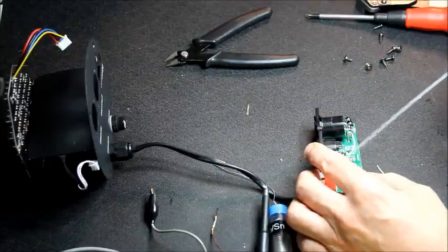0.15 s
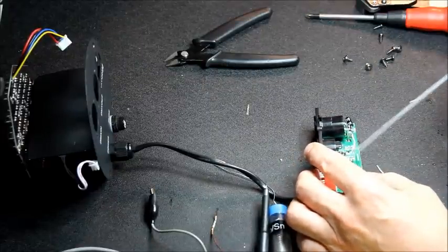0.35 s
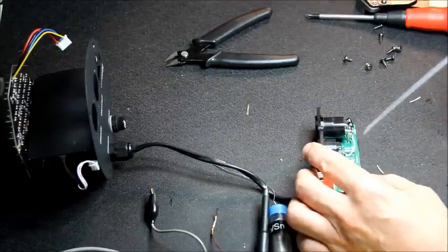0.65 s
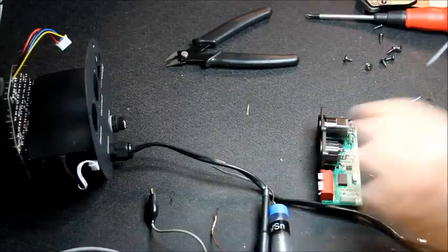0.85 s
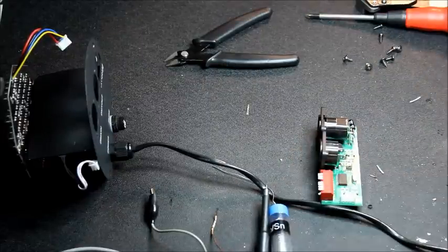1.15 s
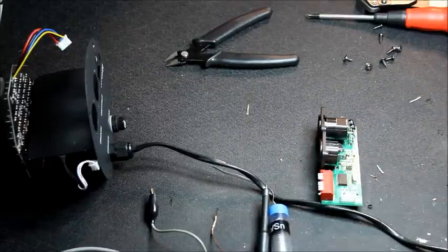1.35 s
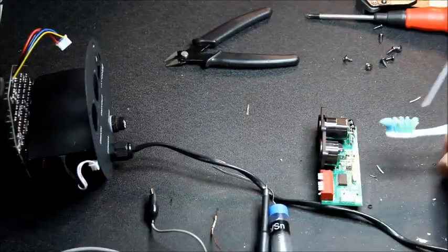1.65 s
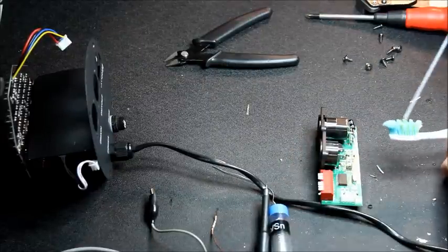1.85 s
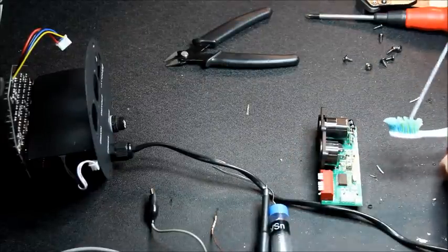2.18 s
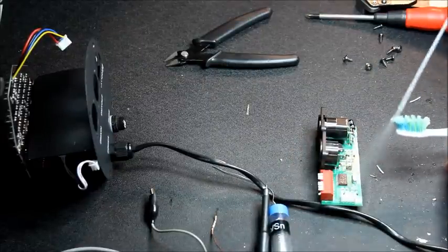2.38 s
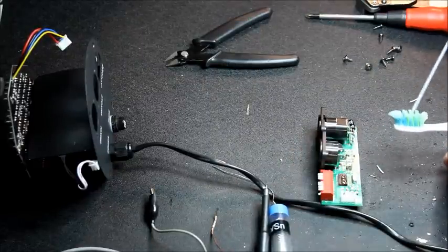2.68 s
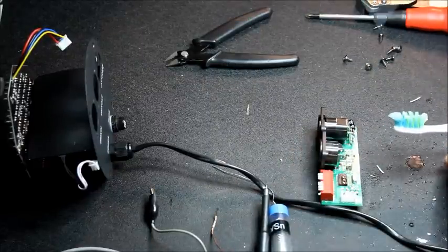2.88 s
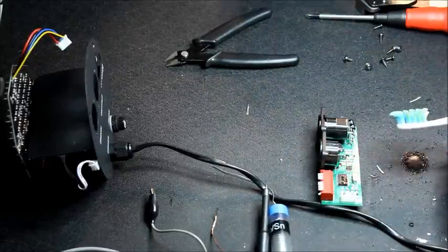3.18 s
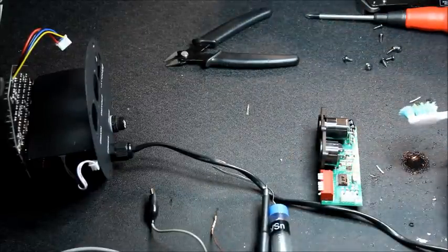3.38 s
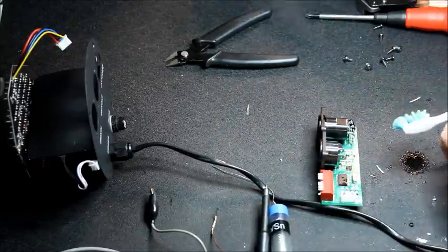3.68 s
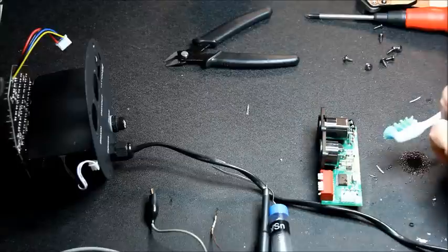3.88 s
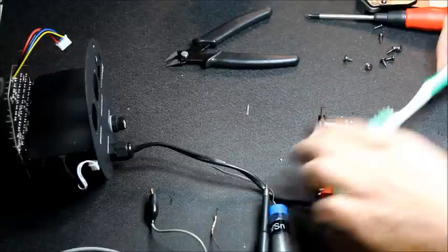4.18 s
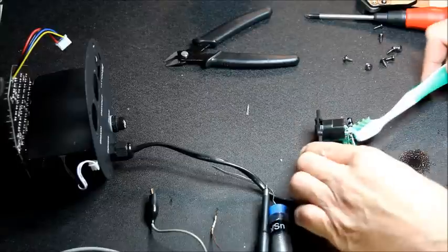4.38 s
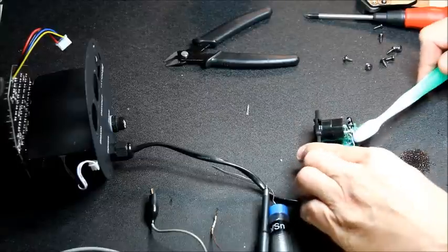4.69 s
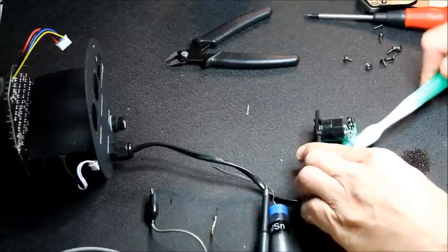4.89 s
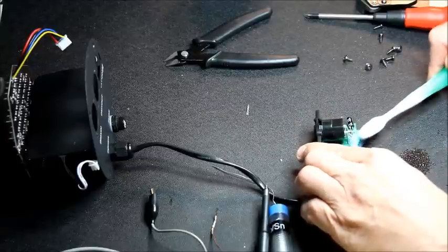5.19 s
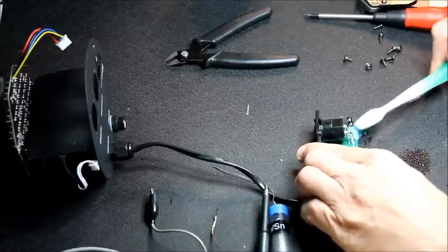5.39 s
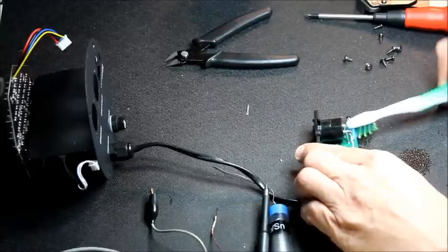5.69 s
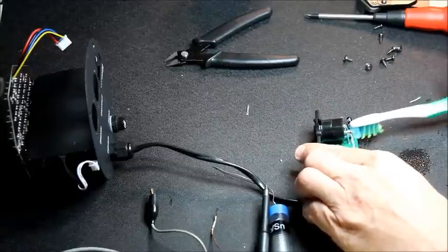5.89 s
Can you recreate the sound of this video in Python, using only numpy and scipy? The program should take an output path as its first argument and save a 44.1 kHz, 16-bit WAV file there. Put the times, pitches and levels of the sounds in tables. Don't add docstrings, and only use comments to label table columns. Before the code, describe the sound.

Two rough hisses from a spray can, one violently loud knock on the bench with a brief metallic ring, then light toothbrush scrubbing over a faint hum.

```python
import sys
import numpy as np
from scipy import signal
from scipy.fft import rfft, irfft, next_fast_len
from scipy.io import wavfile
from scipy.ndimage import uniform_filter1d, map_coordinates

SR = 44100
rng = np.random.default_rng(int(sys.argv[2]) if len(sys.argv) > 2 else 0)


def dump(signal):
    limited = np.clip(np.atleast_2d(signal).T, -1, 1)
    pcm = np.round(limited * 32767).astype(np.int16)
    wavfile.write(sys.argv[1], SR, pcm)


def rack_gain(trim_db):
    fader = np.asarray(trim_db, float)
    return 10 ** (fader / 20)


N = 266805

# start in seconds, level of the blow in dB,
# softness in Hz (lower is duller), decay factor, level of the bench legs' thump in dB.
KNOCKS = [(3.413, 7.5, 2000, .95, -24), (3.49, -17, 400, .7, -44), (3.779, -20, 600, .7, -48),
          (3.811, -18, 350, .8, -48), (.323, -26, 330, .9, -56), (1.3465, -38, 1500, 1.1, -62),
          (5.7705, -33, 1800, .75, -55), (5.786, -38, 700, .7, -70), (1.256, -42, 500, .7, -50),
          (.838, -45, 1500, .45, -62), (3.709, -38, 1200, .7, -64), (6.01, -39, 600, .6, -51),
          (4.425, -52, 300, .7, -52), (4.77, -50, 300, .7, -54), (5.48, -43, 400, .6, -70),
          (1.4, -43, 900, .7, -60)]
HARD_BLOW_S = KNOCKS[0][0]


def unit(x):
    return x / np.sqrt(np.mean(x ** 2) + 1e-20)


def along(points, hz):
    point_hz, values = np.transpose(points)
    return np.interp(np.log(hz + 1), np.log(point_hz + 1), values)


def curves(rows, t):
    seconds, *columns = np.transpose(rows)
    return [np.interp(t, seconds, column) for column in columns]


def bumps(peaks, hz):
    return sum(db / (1 + ((hz - centre) / (width / 2)) ** 2) for centre, width, db in peaks)


def add(track, s, sound):
    part = track[round(s * SR):][:len(sound)]
    part += sound[:len(part)]


def hiss(colour_db, patchy_db, grain_db=0, size=N):
    padded = next_fast_len(size, True)
    grain = unit(uniform_filter1d(rng.standard_normal(padded), size=30))
    raw = rng.standard_normal(padded) * rack_gain(grain_db * grain)
    z = signal.stft(raw, nperseg=1024)[2]
    patches = uniform_filter1d(rng.standard_normal(z.shape), size=8, axis=0)
    patches = uniform_filter1d(patches, size=5, axis=1)
    x = signal.istft(z * rack_gain(patchy_db * unit(patches)), nperseg=1024)[1][:padded]
    colour = rack_gain(colour_db(np.fft.rfftfreq(padded, 1 / SR)))
    return unit(irfft(rfft(x) * colour, padded)[:size])


def dying(colour, decay, factor, size):
    hz, frames, z = signal.stft(rng.standard_normal(size), SR, nperseg=256)
    fade_db = along(colour, hz)[:, None] - 60 * frames / (factor * along(decay, hz)[:, None])
    return signal.istft(z * rack_gain(fade_db), SR, nperseg=256)[1][:size]


def room_tone():
    # pitch in Hz, level in dB per Hz.
    air_colour = [(25, -26), (50, -24), (85, -12), (150, -15), (200, -5), (300, -1), (450, -8), (700, -8),
                  (1000, -10), (2000, -15), (4000, -19), (8000, -24), (15800, -24)]
    # pitch in Hz, width in Hz, height in dB.
    room_peaks = [(318, 70, 5), (598, 40, 4), (232, 30, -4), (700, 30, 2), (1380, 90, 2)]
    # pitch in Hz, level in dB rms.
    hum_tones = [(118.5, -60), (123, -68), (190, -69)]
    air_db = -52
    t = np.arange(N) / SR
    air = hiss(lambda hz: along(air_colour, hz) + bumps(room_peaks, hz), patchy_db=1.2)
    sway = map_coordinates(rng.standard_normal(size=64), [8 * t])
    hum = np.zeros(N)
    for hz, db in hum_tones:
        hum += np.sqrt(2) * rack_gain(db + 1.5 * sway) * np.sin(2 * np.pi * hz * t + .4 * sway)
    return rack_gain(air_db) * air + hum


def plastic_contacts():
    # start in seconds, peak in dB, resonance in Hz, t60 in seconds.
    taps = [(.832, -42, 3000, .02), (.84, -38, 3950, .12), (.844, -35, 2050, .06), (.925, -42, 2000, .03),
            (1.331, -41, 3200, .04), (1.347, -39, 1400, .12), (1.424, -44, 1000, .06),
            (1.345, -42, 8000, .06), (3.35, -48, 6200, .06), (3.709, -41, 5100, .25),
            (3.709, -38, 2000, .15), (3.71, -47, 9300, .2), (3.71, -36, 1350, .2), (3.785, -43, 1800, .06),
            (4.1075, -40, 1900, .05), (4.403, -47, 3300, .03), (4.546, -49, 3500, .08),
            (5.773, -37, 1300, .1), (5.776, -39, 1800, .07), (5.935, -45, 1700, .15)]
    scuffs = [(.232, -47, 4000, .25), (.2765, -36, 5500, .035), (.839, -34, 4300, .07),
              (.93, -40, 4000, .09), (1.923, -37, 3100, .04), (3.163, -50, 8000, .06),
              (3.806, -46, 3200, .08), (4.158, -48, 4800, .06), (5.928, -36.5, 2700, .2),
              (6.01, -42, 2600, .06)]
    slides = [(1.228, -46, 2500, .2), (1.25, -42, 2300, .1), (1.248, -43, 3400, .1),
              (1.288, -46, 3500, .15), (1.415, -47, 3100, .15), (2.995, -48, 2900, .2),
              (3.06, -53, 4000, .2), (4.24, -52, 2300, .3), (4.43, -49, 3500, .12), (5.94, -44, 4200, .2)]
    # share of broad noise in dB, rise in seconds.
    contact_kinds = [
        (-18, .001),
        (-3, .0012),
        (-9, .008),
    ]
    out, t = np.zeros(N), np.arange(SR // 5) / SR
    hz = np.fft.rfftfreq(len(t), 1 / SR)
    broad = 1 / (1 + (500 / (hz + 1)) ** 2 + (hz / 7500) ** 2)
    for rows, (broad_db, rise_s) in zip((taps, scuffs, slides), contact_kinds):
        for s, db, contact_hz, t60 in rows:
            resonance = 1 / (1 + ((hz - contact_hz) / (.1 * contact_hz)) ** 2) ** 2
            power = resonance + rack_gain(2 * broad_db - 16) * broad
            burst = unit(irfft(rfft(rng.standard_normal(len(t))) * np.sqrt(power)))
            rise = 1 - np.exp(-t / max(rise_s, 1e-4))
            add(out, s, rack_gain(db - 1.5 - 60 * t / t60) * rise * burst)
    return out


def spray():
    # time in seconds, flow in dB, wetness in dB (liquid in the jet trades low tone for fizz).
    presses = [
        [(.275, -49, .1), (.294, -44, 1.5), (.346, -44, 1.5), (.362, -40.5, 2.5), (.43, -39.5, -.1),
         (.59, -37.7, .1), (.655, -42, -1.5), (.705, -53.5, -2.5)],
        [(1.922, -50, 2.5), (2.0, -43, -1.5), (2.085, -38, 2.2), (2.37, -35.8, 1.2), (2.49, -38.5, -3.5),
         (2.63, -36, 5.5), (2.7, -35, 1.6), (2.872, -36, 3.5), (2.922, -54, -1.5)],
    ]
    # pitch in Hz, width in Hz, height in dB.
    straw_near_board = [(500, 120, 5), (1290, 170, 8.5), (2030, 200, 6), (2410, 100, 6), (3150, 150, 4),
                        (3420, 200, 4), (3810, 150, 4), (4540, 250, 4), (6200, 700, 8), (7480, 250, 5),
                        (8610, 200, 3), (10000, 200, 4), (12100, 300, 3), (14500, 4000, -4),
                        (8300, 1500, 2)]
    straw_at_brush = [(640, 100, 4), (950, 150, 7), (1180, 250, 7), (2000, 200, 3), (2270, 150, 6),
                      (2460, 100, 4), (2750, 250, -3), (3250, 400, 6.5), (4000, 200, 5), (4450, 300, 5),
                      (4800, 150, 7.5), (5450, 200, 3), (7080, 250, 6), (7830, 300, 3), (10500, 300, 3),
                      (14000, 400, 3), (14300, 3500, 3)]
    # pitch in Hz, level in dB per Hz.
    jet_colour = [(60, -40), (200, -16), (420, -3.5), (900, -3.5), (1700, -3.5), (3000, -1), (6000, -3),
                  (10000, -5), (15800, -6)]
    low_tone_db, fizz_share_db = -5.5, -2.4
    full_flow_db, fizz_grows, low_grows = -37, .12, -.05
    shut_s, shut_db_per_s = .07, -180
    out = np.zeros(N)
    for rows, straw in zip(presses, (straw_near_board, straw_at_brush)):
        open_s, close_s = rows[0][0], rows[-1][0]
        t = np.arange(round(open_s * SR), round((close_s + shut_s) * SR)) / SR
        jet_db, wet_db = curves(rows, t)
        jet_db = jet_db + shut_db_per_s * np.maximum(t - close_s, 0)
        low_db = low_tone_db + low_grows * (jet_db - full_flow_db) - wet_db
        fizz_db = fizz_share_db + fizz_grows * (jet_db - full_flow_db) + .6 * wet_db
        bands = ((jet_db + low_db, 20, 1700), (jet_db, 1700, 7200), (jet_db + fizz_db, 7200, 20000))
        for level_db, lo_hz, hi_hz in bands:
            def colour(hz):
                band_db = -10 * np.log10((1 + (lo_hz / (hz + 1)) ** 12) * (1 + (hz / hi_hz) ** 12))
                return along(jet_colour, hz) + bumps(straw, hz) + band_db

            flow = hiss(colour, patchy_db=1.1, grain_db=1.2, size=SR * 3 // 2)[:len(t)]
            add(out, t[0], rack_gain(level_db + 1.2) * flow)
    return out


def knocks():
    # pitch in Hz, level in dB, t60 in seconds.
    bench_modes = [(231, -6, .16), (135, -13, .1), (182, -14, .12), (253, -8, .34), (273, -2, .14),
                   (322, 1.5, .11), (396, -9, .14), (380, 7, .03), (493, -10, .15), (680, 13, .024),
                   (621, -3, .09), (674, -2, .09), (727, -2, .085), (776, -2, .08), (931, -13, .1),
                   (1075, -6, .08), (1200, -14, .12), (1379, -14, .11), (1480, -16, .1), (1661, -19, .1),
                   (1950, -15, .09), (2400, -9, .05)]
    # pitch in Hz, level in dB.
    bench_body = [(40, -24), (100, -32), (200, -6), (400, 0), (700, 0), (1500, -5), (3000, -14),
                  (6000, -26), (15000, -35)]
    # pitch in Hz, t60 in seconds.
    bench_decay = [(60, .2), (250, .22), (600, .135), (2000, .17), (5000, .17), (12000, .09)]
    leg_hz, leg_t60 = 64, .26
    out, t = np.zeros(N), np.arange(SR // 2) / SR
    hz, level_db, t60 = np.transpose(bench_modes)[:, :, None]
    for s, db, soft_hz, decay, thump_db in KNOCKS:
        strength_db = level_db + rng.normal(0, 1.5, hz.shape)
        modes = rack_gain(strength_db - 60 * t / (t60 * decay)) * np.sin(2 * np.pi * hz * t)
        ring = -np.sum(modes, axis=0)
        dense = dying(bench_body, bench_decay, decay, size=len(t))
        body = (rack_gain(-6) * ring + rack_gain(4) * dense) * (1 - np.exp(-t * soft_hz / 1.3))
        contact = signal.butter(N=1, Wn=[135, max(soft_hz, 170)], btype="band", fs=SR)
        thump = rack_gain(thump_db - 60 * t / leg_t60) * np.sin(2 * np.pi * leg_hz * t)
        thump = thump * (1 - np.exp(-t / .008))
        add(out, s, rack_gain(db) * signal.lfilter(*contact, body) + thump)
    return out


def snaps():
    # start in seconds, peak in dB, pitch in Hz, t60 in seconds.
    snap_events = [(.8325, -38, 3000, .006), (.8387, -24, 4300, .012), (.8388, -34, 8000, .005),
                   (.8965, -42, 2600, .01), (.9315, -39.5, 4000, .015), (1.3308, -37, 3000, .008),
                   (3.7092, -36, 3500, .004), (3.778, -36, 3000, .008), (4.7394, -41, 3000, .006),
                   (4.7713, -38, 3850, .01), (4.8472, -40, 6500, .006), (5.1759, -36, 3070, .01),
                   (5.2931, -40, 3080, .008), (5.339, -42, 9000, .004), (5.3715, -39, 6000, .006),
                   (5.4707, -35, 10500, .008), (5.7706, -33, 2000, .004), (5.772, -29, 3200, .008),
                   (5.7795, -36, 1700, .015), (5.7825, -36, 2600, .006), (5.9287, -33, 2640, .01),
                   (6.0105, -37, 3030, .008)]
    out, t = np.zeros(N), np.arange(SR // 25) / SR
    for s, db, snap_hz, t60 in snap_events:
        add(out, s, rack_gain(db - 60 * t / t60) * np.sin(2 * np.pi * snap_hz * t))
    return out


def handling():
    # start in seconds, rustle in dB, low shuffle over rustle in dB, t60 in seconds.
    grips = [(.836, -36, -10, .14), (.915, -48, -1.5, .45), (1.243, -51, -1.1, 1.5), (1.352, -54, 10.5, .8),
             (2.96, -59, .1, 1.8), (3.164, -61, -4, .25), (3.706, -42, 1.1, .4), (3.776, -45, 15.5, .26),
             (4.12, -57, -1.1, .7), (4.22, -62, 1.1, 2.5), (4.398, -56, -8, .7), (4.543, -56, -13, .3)]
    # pitch in Hz, level in dB per Hz.
    rustle_colour = [(900, -20), (1600, -3), (3000, 0), (5000, -4), (8000, -12), (15800, -20)]
    shuffle_colour = [(30, -24), (60, -8), (150, 1.5), (500, -2), (1100, -8), (1800, -14), (4000, -40)]
    rise_s, shuffle_lingers = .006, 1.5
    t, size = np.arange(SR // 2) / SR, 5 * SR
    skin, bench = np.zeros((2, size))
    grip = (1 - np.exp(-t / rise_s)) ** 2 * np.cos(np.pi * t) ** 2
    for s, db, low_db, t60 in grips:
        add(skin, s, grip * rack_gain(2 * (db - 4 - 60 * t / t60)))
        add(bench, s, grip * rack_gain(2 * (db - 4 + low_db - 60 * t / (t60 * shuffle_lingers))))
    rustle = hiss(lambda hz: along(rustle_colour, hz), patchy_db=3, grain_db=3, size=size)
    shuffle = hiss(lambda hz: along(shuffle_colour, hz), patchy_db=3, grain_db=2.1, size=size)
    return np.pad(np.sqrt(skin) * rustle + np.sqrt(bench) * shuffle, (0, N - size))


def can_ring():
    # pitch in Hz, level in dB, t60 in seconds.
    wall_tones = [(1141, -38, 1.6), (807, -52, 1.6)]
    gripped_s = 3.712
    t = np.arange(N) / SR - HARD_BLOW_S
    ring = sum(rack_gain(db - 60 * np.abs(t) / t60) * np.sin(2 * np.pi * hz * t) for hz, db, t60 in wall_tones)
    damping = rack_gain(-60 * np.maximum(t + HARD_BLOW_S - gripped_s, 0) / .04)
    return ring * (t > 0) * damping


def brush():
    # peak time in seconds, bristle fizz in dB, board scrape over fizz in dB, 3 dB rise in seconds.
    strokes = [(4.613, -53, 1.3, .006), (4.665, -50, .1, .019), (4.742, -53, 1.1, .007),
               (4.777, -49, 1.1, .007), (4.82, -53, -1.1, .006), (4.851, -48, 1.1, .007),
               (4.897, -52, 4, .028), (4.955, -54, 3, .015), (5.003, -46, 5, .015), (5.083, -51, 1.1, .035),
               (5.181, -46.5, 2.1, .009), (5.25, -54, 4, .016), (5.297, -52, 3, .007),
               (5.345, -50, -4, .005), (5.382, -49, 5, .013), (5.438, -50, 1.2, .01),
               (5.473, -45, .1, .004), (5.49, -39, -1.1, .01), (5.54, -49, .1, .015), (5.586, -49, -3, .02),
               (5.635, -55, 3, .015), (5.689, -57, 4, .02), (5.772, -50, -2.1, .012),
               (5.843, -48.7, -3, .013), (5.895, -56, 4, .015), (5.94, -52, 5, .007),
               (6.012, -47, .1, .005)]
    # pitch in Hz, level in dB per Hz.
    bristle_colour = [(3000, -20), (5500, -4), (7500, 0), (9000, -3), (12000, -1), (15800, -2)]
    board_colour = [(70, -30), (160, -7), (400, 1.2), (1000, -1.5), (2100, -6), (3400, -3), (4500, -5),
                    (6500, -10), (10000, -30)]
    # pitch in Hz, width in Hz, height in dB.
    board_peaks = [(222, 40, 9), (690, 80, 2), (2300, 200, 1.5), (3050, 400, 1.2), (4050, 300, 1.5),
                   (7470, 600, 1.5)]
    brush_down_s, press_s = 4.5, .45
    drag_fizz_db, drag_scrape_db = -59, -56.5
    fall_s = .014
    t = np.arange(round(brush_down_s * SR), N) / SR
    touch = np.clip((t - t[0]) / press_s, 0, 1)
    fizz = touch * rack_gain(drag_fizz_db) ** 2
    scrape = touch * rack_gain(drag_scrape_db) ** 2
    for s, fizz_db, scrape_db, rise_s in strokes:
        distance = np.abs(t - s) / np.where(t < s, rise_s, fall_s)
        power = rack_gain(2 * (fizz_db - 3 * distance ** 2.1))
        fizz = fizz + power
        scrape = scrape + power * rack_gain(2 * scrape_db)
    tips = hiss(lambda hz: along(bristle_colour, hz) + bumps(board_peaks, hz),
                patchy_db=1.5, grain_db=2.2, size=2 * SR)[:len(t)]
    board = hiss(lambda hz: along(board_colour, hz) + bumps(board_peaks, hz),
                 patchy_db=2.8, grain_db=2.6, size=2 * SR)[:len(t)]
    out = np.zeros(N)
    add(out, t[0], rack_gain(1.4) * np.sqrt(fizz) * tips + rack_gain(-.6) * np.sqrt(scrape) * board)
    return out


def catches():
    # start in seconds, length in seconds, level in dB, the part's pitch in Hz.
    caught_parts = [(4.641, .046, -52, 4600), (4.739, .012, -53, 4000), (4.771, .028, -50, 3500),
                    (4.772, .026, -54, 7000), (4.846, .014, -51, 7000), (4.875, .04, -53, 3600),
                    (4.89, .02, -55, 6300), (4.975, .045, -48, 2800), (4.99, .03, -52, 1300),
                    (5.0, .02, -53, 4100), (5.076, .022, -51, 7600), (5.05, .06, -55, 3200),
                    (5.176, .02, -50, 3000), (5.18, .025, -54, 7500), (5.24, .03, -55, 3200),
                    (5.293, .01, -52, 6500), (5.34, .035, -55, 12000), (5.372, .032, -51, 3500),
                    (5.373, .02, -53, 7300), (5.43, .03, -54, 10500), (5.455, .015, -53, 7200),
                    (5.485, .02, -49, 4100), (5.575, .045, -52, 7600), (5.76, .012, -54, 10500),
                    (5.82, .03, -55, 7000), (5.945, .035, -50, 2900), (5.95, .03, -53, 4300)]
    half_width, edge_s = .2, .003
    out, t = np.zeros(N), np.arange(SR // 10) / SR
    hz = np.fft.rfftfreq(len(t), 1 / SR)
    for s, length, db, part_hz in caught_parts:
        flicks = rng.standard_normal(len(t)) * rack_gain(2.8 * rng.standard_normal(len(t)))
        resonance = 1 / (1 + ((hz - part_hz) / (half_width * part_hz)) ** 2)
        ring = unit(irfft(rfft(flicks) * resonance))
        gate = np.clip(t / (edge_s / 3), 0, 1) * rack_gain(-6 * np.maximum(t - length, 0) / edge_s)
        add(out, s, rack_gain(db - 1.5) * gate * ring)
    return out


def walls(x, wet_db, factor):
    # pitch in Hz, t60 in seconds.
    room_decay = [(150, .35), (800, .27), (4000, .25), (12000, .15)]
    tail = dying([(100, -6), (1000, 0), (4000, 0), (15000, -4)], room_decay, factor, size=SR // 3)
    delayed = np.pad(x, (SR // 150, 0))
    echo = signal.fftconvolve(delayed, tail / np.linalg.norm(tail))[:N]
    return x + rack_gain(wet_db) * echo


def scene():
    hits = walls(knocks() + plastic_contacts() + snaps(), wet_db=-16, factor=1.1)
    hisses = rack_gain(-.5) * walls(spray() + handling(), wet_db=-10, factor=.35)
    scrub = walls(brush() + catches(), wet_db=-13, factor=.4)
    return np.tile(room_tone() + hits + can_ring() + hisses + scrub, (2, 1))


def top_cut(x):
    return signal.sosfilt(signal.butter(12, 15850, fs=SR, output="sos"), x)


def record(dry):
    duck_full_db, attack_s, hold_s, release_s = -10.5, .025, .15, .14
    top_hz, offset = 15830, .0009
    low_pass = signal.ellip(N=10, rp=.5, rs=60, Wn=top_hz, fs=SR, output="sos")
    limited = signal.sosfilt(low_pass, dry)
    since = np.maximum(np.arange(N) / SR - HARD_BLOW_S, 0)
    attack = 1 - np.exp(-(since / attack_s) ** 2)
    release = np.exp(-np.maximum(since - hold_s, 0) / release_s)
    ducked = limited * rack_gain(duck_full_db * attack * release) + offset
    clipped = ducked / (1 + np.abs(ducked) ** 30) ** (1 / 30)
    return top_cut(clipped)


dry = scene()
out = record(dry)
dump(out)
```